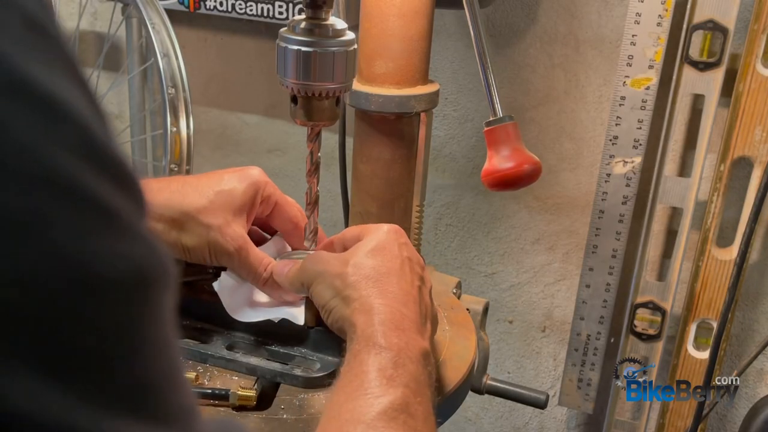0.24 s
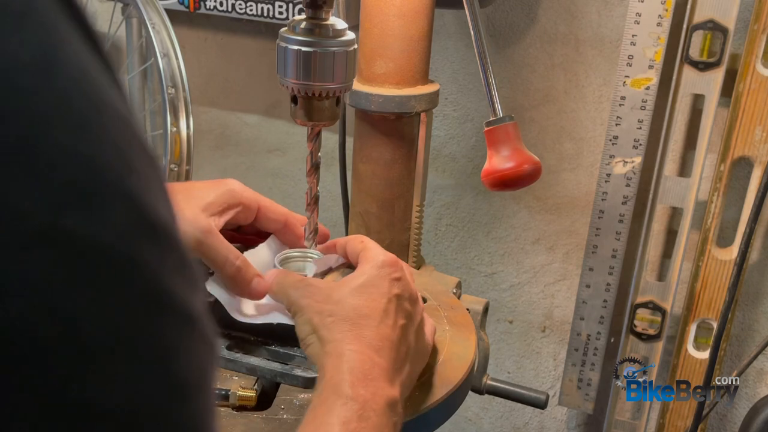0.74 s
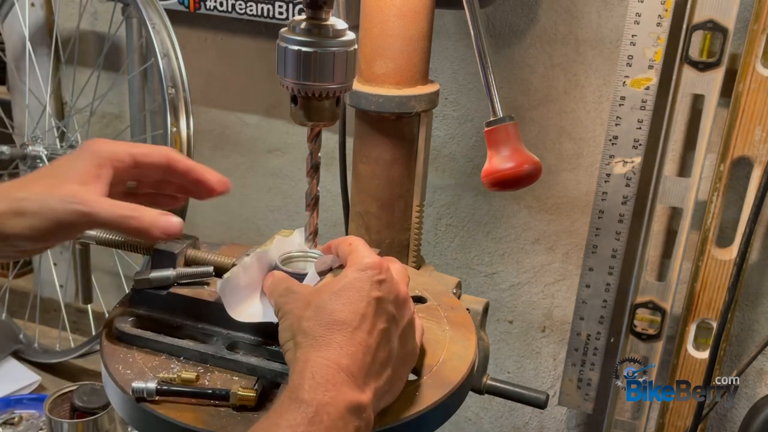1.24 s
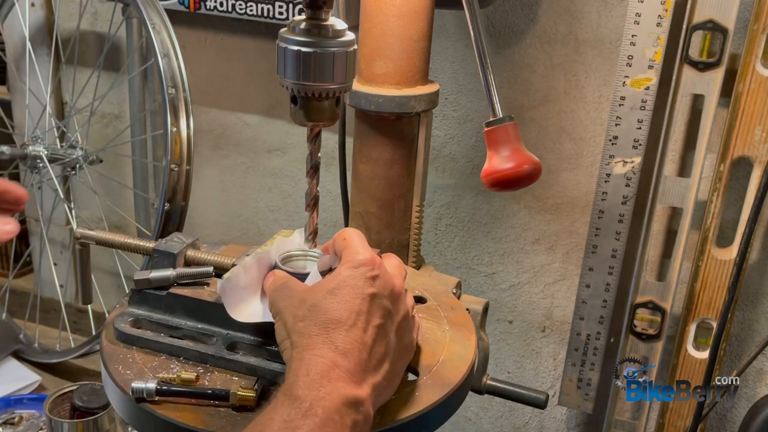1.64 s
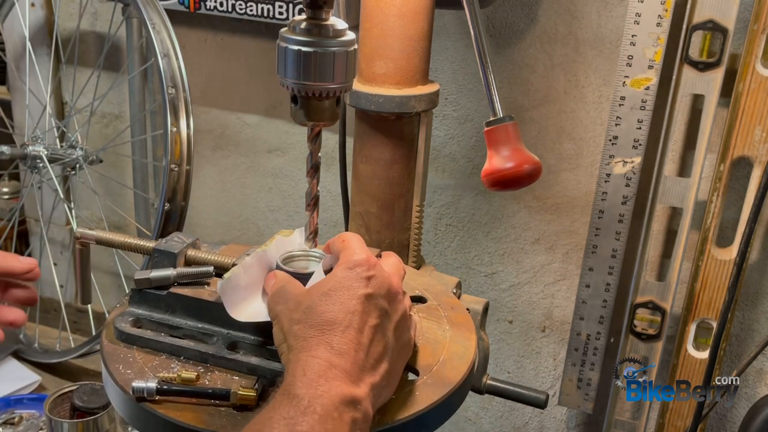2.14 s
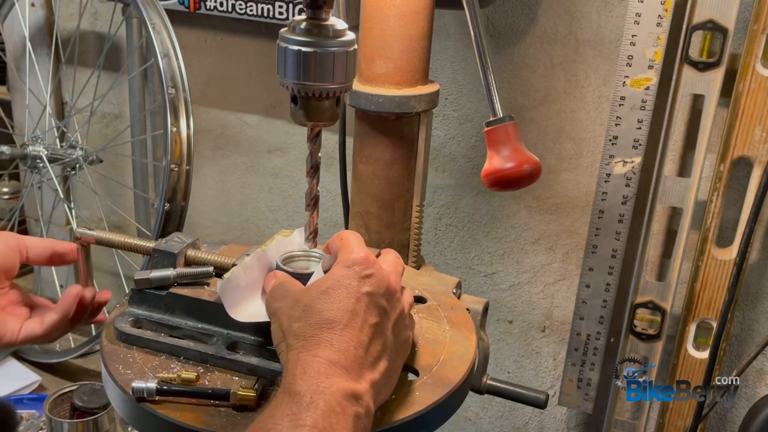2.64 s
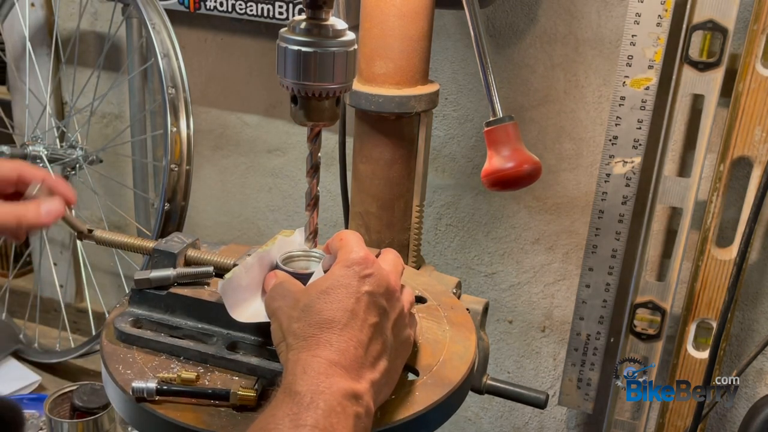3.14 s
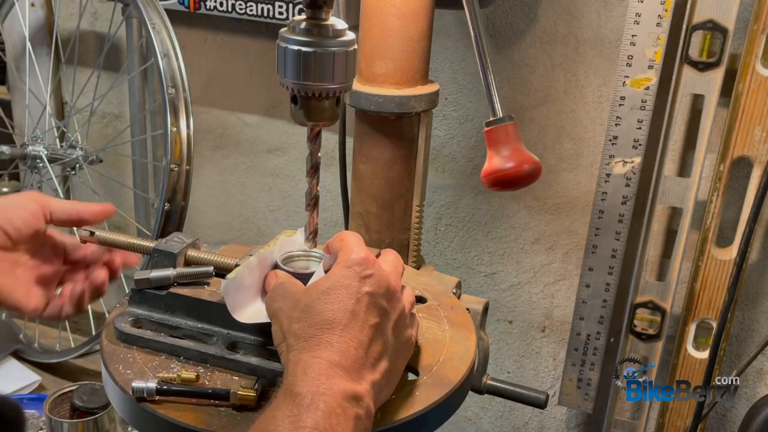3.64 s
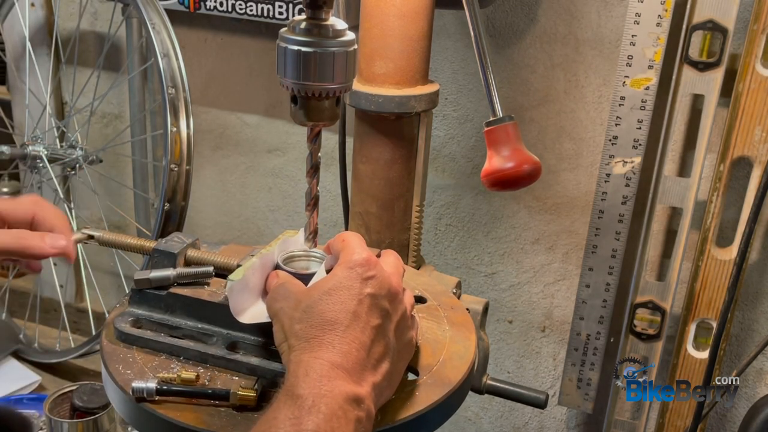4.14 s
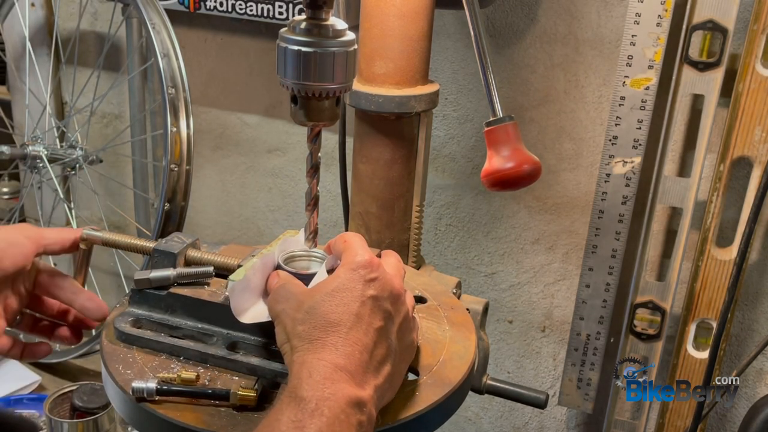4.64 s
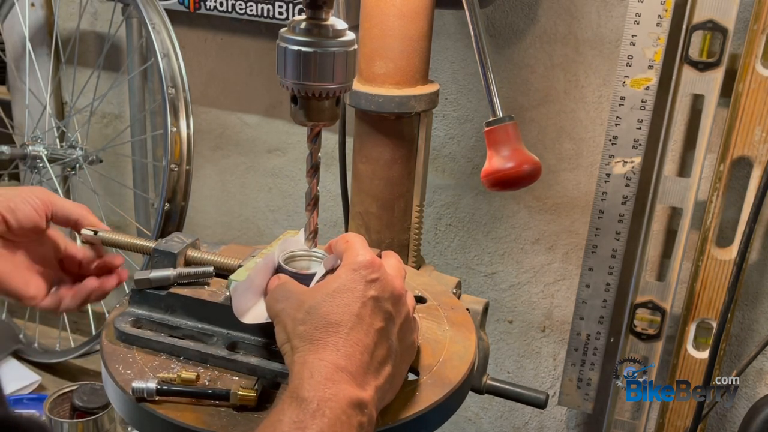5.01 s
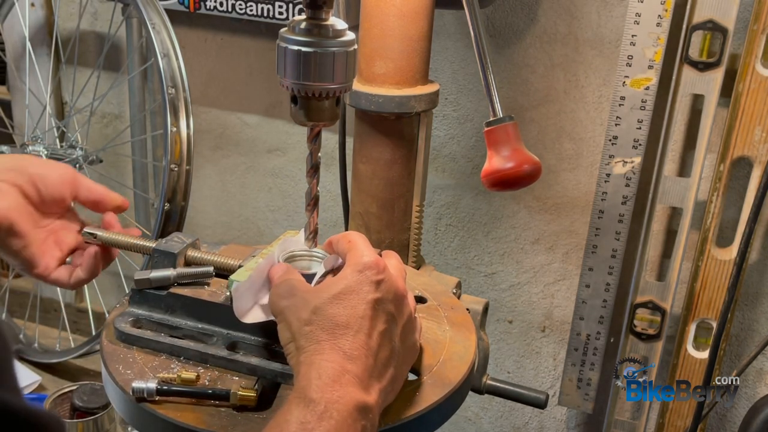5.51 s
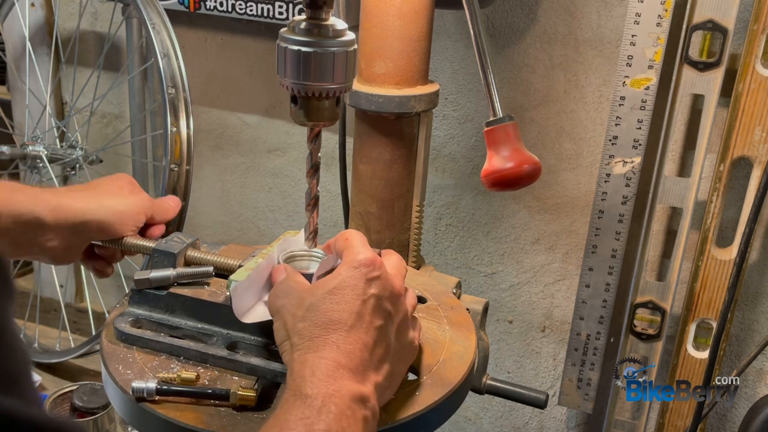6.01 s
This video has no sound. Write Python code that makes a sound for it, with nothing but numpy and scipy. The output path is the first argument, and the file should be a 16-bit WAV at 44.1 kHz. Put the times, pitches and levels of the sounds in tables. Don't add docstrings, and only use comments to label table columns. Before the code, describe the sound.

Crinkling paper and finger rubs come first, close and dry, then two sharp cracks of buckling thin metal and a few scuffs. Near silence leaves faint insect chirps, airy hiss and a low distant traffic wash. Then a vise screw binds with short gritty metallic squeaks, isolated handle ticks, and a final ringing steel clunk. A small hard-walled workshop, captured near the bench in stereo.

```python
import sys
import numpy as np
from scipy import signal
from scipy.fft import rfft, irfft, next_fast_len
from scipy.io import wavfile
from scipy.ndimage import uniform_filter1d, map_coordinates

SR = 44100
rng = np.random.default_rng(int(sys.argv[2]) if len(sys.argv) > 2 else 0)


def unload_audio(sound):
    columns = np.transpose(np.atleast_2d(sound))
    steps = np.round(np.clip(columns, -1, 1) * 32767)
    wavfile.write(sys.argv[1], SR, steps.astype(np.int16))


def rack_gain(trim_db):
    fader = np.asarray(trim_db, float)
    return 10 ** (fader / 20)


N = 276507


def unit(x):
    return x / np.sqrt(np.mean(x ** 2) + 1e-20)


def along(points, hz):
    f, v = np.transpose(points)
    return np.interp(np.log(hz + 1), np.log(f + 1), v)


def wobble(rate_hz):
    knots = rng.standard_normal(int(N * rate_hz / SR) + 4)
    return map_coordinates(knots, [np.arange(N) * rate_hz / SR])


def filtered(x, response):
    m = next_fast_len(x.shape[-1] + 8192)
    spectrum = rfft(x, m) * response(np.fft.rfftfreq(m, 1 / SR))
    return irfft(spectrum, m)[..., :x.shape[-1]]


def body(peaks):
    def peak(f, centre, width, db):
        return rack_gain(db) * 1j * f * width / (centre * centre - f * f + 1j * f * width)
    return lambda f: sum((-1) ** k * peak(f, *p) for k, p in enumerate(peaks))


def grit(spiky_db):
    size_db = spiky_db * uniform_filter1d(rng.exponential(size=N), size=3)
    return rng.standard_normal(N) * rack_gain(size_db)


def colour(x, spectrum):
    return unit(filtered(x, lambda hz: rack_gain(along(spectrum, hz))))


def place(track, s, sound):
    k = round(s * SR)
    return track + np.pad(sound, (k, N))[:N]


def strokes(rows, rise_s, fall_s):
    t, rows = np.arange(0, N / SR, .001), np.asarray(rows)
    since_s = t - rows[:, :1]
    slope = np.maximum(-since_s / rise_s, (since_s - abs(rows[:, 1:2])) / fall_s)
    shape_db = -20 * np.maximum(slope, 0)
    gains = np.sqrt(rack_gain(2 * rows[:, 2:].T) @ rack_gain(2 * shape_db))
    return [np.interp(np.arange(N) / SR, t, g) for g in gains]


def wide(spectrum, patchy_db):
    # f/Hz, correlation
    alike = [(60, 0.96), (250, 0.84), (500, 0.79), (1100, 0.077), (2400, 0.86), (4500, 0.91), (6000, 0.9),
             (15000, 0.06)]
    z = signal.stft(rng.standard_normal((2, N + 512)), nperseg=512)[2]
    field = uniform_filter1d(rng.standard_normal(z.shape[1:]), size=5, axis=0)
    field = uniform_filter1d(field, size=10, axis=1)
    pair = signal.istft(z * rack_gain(patchy_db * unit(field)), nperseg=512)[1][:, :N]

    def mid_side(hz):
        angle = np.arccos(np.clip(along(alike, hz), -1, 1)) / 2
        return rack_gain(along(spectrum, hz)) * [np.cos(angle), np.sin(angle)]
    mid, side = filtered(pair, mid_side)
    return unit(np.array([mid + side, mid - side]))


def traffic():
    # nearest t/s, distance over speed/s, engine level/dB, tyre level/dB
    passes = [(0.372, 0.076, -78, -68), (0.881, 0.17, -75.5, -68), (1.4, .15, -81, -75),
              (1.947, 0.15, -80, -78), (2.85, 0.02, -82, -69.5), (3.249, 0.16, -80.5, -65.5),
              (3.75, 0.27, -72, -67), (4.3, 0.75, -77, -72), (5.149, 0.1, -73, -70.5),
              (5.621, 0.25, -71.5, -64), (6.05, 0.18, -74, -73.5)]
    # f/Hz, density/dB per Hz
    rumble = [(15, -39), (30, -15.5), (55, -2), (90, -5.5), (140, -4.5), (250, -24), (500, -100)]
    # f/Hz, density/dB per Hz
    road = [(60, -49.5), (130, -11), (220, 0.5), (490, -0.5), (950, -4), (1400, -10), (2200, -11.5),
            (4000, -15.5), (8000, -100)]
    city_db = np.array([[-85], [-97]])
    fade_db = 15.5
    s, span, *levels_db = np.transpose(passes)
    t = np.arange(0, N / SR, .01)
    distance_sq = 1 + ((t - s[:, None]) / span[:, None]) ** 2
    near = distance_sq ** (-fade_db / 10)
    power = rack_gain(2 * np.array(levels_db)) @ near + rack_gain(2 * city_db)
    engines, tyres = (np.interp(np.arange(N) / SR, t, np.sqrt(p)) for p in power)
    tyres = tyres * rack_gain(0.534 * wobble(5.5))
    return engines * wide(rumble, patchy_db=1.5) + tyres * wide(road, patchy_db=1.7)


def night_air():
    # f/Hz, density/dB per Hz
    night = [(400, -43.5), (800, -20), (2500, -21), (4300, -19.5), (4900, -11), (5650, -5), (6300, -11.5),
             (7000, -9), (7450, -8), (8000, -19), (9000, -11.5), (11000, -17), (12500, -23), (16000, -50)]
    return rack_gain(-71 + .6 * wobble(4)) * wide(night, patchy_db=.8)


def crickets():
    chirp_db = [-71, -69.5, -70.5, -69, -72.5, -70, -70]
    first_s, every_s = 1.83, .587
    trill_start_db, sag_db_per_s, trill_end_s = -75, 1, 3.43
    t = np.arange(N) / SR

    def beats(rate_hz):
        return (.5 + .5 * np.cos(2 * np.pi * rate_hz * t + 0.37 * wobble(8))) ** 0.25
    swell = np.zeros(N)
    for s, db in zip(first_s + every_s * np.arange(len(chirp_db)), chirp_db):
        swell += rack_gain(db) * np.sin(np.pi * np.clip((t - s + 0.011) / 0.19, 0, 1)) ** 0.73
    wing = body([(4850, 350, -5), (5200, 220, 0)])
    chirp = filtered(beats(51) * rng.standard_normal(N), lambda f: wing(f) ** 2)
    tone = np.sin(2 * np.pi * 6960 * t + 1.32 * wobble(70))
    trill = beats(35) * tone * rack_gain(2.8 * wobble(23))
    trill_db = trill_start_db - sag_db_per_s * t - 300 * np.maximum(t - trill_end_s, 0)
    return swell * unit(chirp) * rack_gain([[2.5], [-2.5]]) + rack_gain(trill_db) * unit(trill)


def ticks(table, rise_s, lift_db):
    out, t = np.zeros(N), np.arange(3000) / SR
    mid_peak = body([(4000, 2500, 0)])
    sharp_peaks = body([(7200, 2500, 0), (9000, 2500, 0), (11500, 2000, -4)])

    def soft(f):
        return (1j * f / 700 / (1 + 1j * f / 700)) ** 2 / (1 + 1j * f / 2600) ** 2

    def sharp(f):
        return sharp_peaks(f) * 1j * f / (4000 + 1j * f)
    for s, db, low_db, high_db, t60 in table:
        decay = rack_gain(-60 * t / np.clip(t60, .002, .07))
        blow = rng.standard_normal(len(t)) * decay * (1 - np.exp(-t / rise_s))
        click = filtered(blow, lambda f: rack_gain(low_db + 9.0) * soft(f) + rack_gain(-5.5) * mid_peak(f) ** 2
                         - rack_gain(high_db + 11.0) * sharp(f))
        out = place(out, s, rack_gain(db + lift_db) * click / abs(click).max())
    return out


def paper():
    # t/s, hold/s, rustle level/dB, sheet/dB re rustle, thump/dB re rustle
    rubs = [(0.015, 0.844, -58.5, -11.5, -32), (0.074, 0.0097, -57, -38, -40), (0.181, 0.039, -62, -9, -38),
            (0.256, 0.034, -51, -15, -24), (0.31, 0.056, -52, -13.5, -38), (0.526, 0.032, -57, -13, -27),
            (0.74, 0.094, -56, -14, -23), (0.877, 0.11, -52, -12.5, -33.5), (0.876, 0.02, -51.5, -18, -3.5),
            (0.893, 0.013, -47, -15, -1), (1.666, 0.005, -64.5, -8, -25), (1.059, 0.081, -71, 1, -24),
            (1.339, 0.0034, -46, -9, -45.5), (1.372, 0.041, -52.5, -2, -16.5),
            (1.512, 0.089, -59.5, -8, -16), (1.577, 0.02, -56.5, -6, -33), (1.656, 0.073, -80, 2, -22),
            (1.792, 0.012, -70, -7.5, -5), (1.937, 0.002, -52, -3, -11)]
    # f/Hz, density/dB per Hz
    rustle_spectrum = [(1600, -35.5), (2800, -26.5), (3700, -6), (4800, -2), (6500, -4.5), (8800, 2.5),
                       (11000, 8), (13000, -21.5), (15000, -7), (16500, -23)]
    # f/Hz, density/dB per Hz
    sheet_spectrum = [(260, -40.5), (450, -11), (513, -9.5), (585, -15.5), (1030, -8.5), (1610, -10),
                      (2300, -3.5), (3200, -0.5), (4160, -22.5), (7040, -120)]
    # f/Hz, density/dB per Hz
    thump_spectrum = [(80, -44.5), (130, -9), (200, -4), (330, -3.5), (500, -18.5)]
    rows = [(s, hold, db, db + sheet_db, db + thump_db) for s, hold, db, sheet_db, thump_db in rubs]
    rustle, sheet, thump = strokes(rows, rise_s=0.013, fall_s=0.054)
    slips = grit(spiky_db=2.6) * rack_gain(1.3 * wobble(90))
    rubbing = rustle * colour(slips, rustle_spectrum) + sheet * colour(slips, sheet_spectrum)
    return rubbing + thump * colour(rng.standard_normal(N), thump_spectrum)


def hollows():
    # centre t/s, length/s, f/Hz, width/Hz, level/dB
    slides = [(0.152, 0.024, 2630, 700, -62), (0.141, 0.022, 1070, 200, -69),
              (0.262, 0.049, 1120, 400, -61.5), (0.283, 0.086, 4800, 900, -60),
              (0.312, 0.013, 2620, 600, -52), (0.315, 0.046, 1370, 400, -59),
              (0.342, 0.051, 5200, 1200, -50.5), (0.364, 0.04, 1090, 200, -57),
              (0.383, 0.011, 2450, 500, -53.5), (0.399, 0.039, 1360, 300, -66),
              (0.465, 0.03, 1090, 300, -66.5), (0.498, 0.046, 790, 510, -64.5),
              (0.742, 0.013, 2760, 600, -56), (0.757, 0.024, 1140, 300, -64),
              (0.8, 0.053, 1320, 400, -62.5), (0.882, 0.02, 860, 300, -57), (0.899, 0.022, 8940, 1500, -43),
              (1.003, 0.011, 2930, 1500, -55.5), (1.064, 0.007, 980, 400, -65.5),
              (2.816, 0.023, 1300, 900, -72), (2.94, 0.056, 868, 60, -65), (3.091, 0.021, 930, 80, -61),
              (3.16, 0.01, 1940, 200, -56), (3.168, 0.036, 3180, 252, -78), (3.177, 0.016, 960, 80.5, -48),
              (3.55, 0.066, 2187, 91, -62), (1.342, 0.0079, 2230, 600, -47), (5.296, 0.081, 1470, 700, -63),
              (5.408, 0.028, 700, 500, -58), (5.48, 0.054, 786, 497, -53.5), (4.053, 0.014, 2270, 200, -63),
              (4.06, 0.012, 8900, 1500, -54), (4.429, 0.019, 3780, 900, -60), (4.51, 0.023, 2380, 251, -69),
              (4.512, 0.023, 9940, 1190, -49.5), (4.592, 0.017, 3200, 500, -65),
              (4.631, 0.064, 2980, 1200, -68), (4.686, 0.011, 3650, 1210, -61.5),
              (5.571, 0.0093, 2880, 1182, -56.5),
              (1.72, 0.052, 3100, 900, -68), (3.204, 0.11, 9200, 400, -76), (3.597, 0.14, 7700, 500, -74),
             (3.715, 0.1, 7650, 500, -75), (5.285, 0.06, 2490, 500, -58), (5.372, 0.035, 2650, 600, -60),
             (2.451, 0.18, 1500, 1830, -75.5), (2.564, 0.1, 2600, 1482, -81),
             (3.001, 0.13, 2600, 1410, -74), (3.296, 0.065, 3000, 2000, -87),
             (5.511, 0.042, 262, 60, -51.5)]
    half_s = 5000 / SR
    out, u = np.zeros(N), np.linspace(-1, 1, 10001)
    for s, length, hz, width, db in slides:
        slips = rng.standard_normal(len(u)) * rack_gain(3.8 * rng.exponential(size=len(u)))
        ring = unit(filtered(slips, lambda f: body([(hz, width, 0)])(f) ** 2))
        swell = np.exp(-(u * half_s / (length / 2)) ** 2)
        out = place(out, s - half_s, rack_gain(db - 2.5) * ring * swell)
    return out


def tin(blow, low_hz, low_db, middle_db, high_db):
    # f/Hz, width/Hz, level/dB
    tin_mid = [(3100, 1200, -0.5), (4670, 2240, -5)]
    # f/Hz, width/Hz, level/dB
    tin_high = [(6410, 390, -1), (7970, 1100, 3), (10400, 1300, 6)]
    edge_hz, edge_width = 1800, .72

    def response(f):
        groups = body([(low_hz, 900, low_db)])(f)
        groups = groups - rack_gain(middle_db) * body(tin_mid)(f) + rack_gain(high_db) * body(tin_high)(f)
        edge = -f * f / (edge_hz ** 2 - f * f + 1j * f * edge_hz * edge_width)
        bass = rack_gain(-22.5) * body([(1000, 1000, 0)])(f) * 1j * f / (250 + 1j * f)
        return groups * edge ** 3 + bass
    return filtered(blow, response)


def snaps():
    # t/s, peak level/dB, lowest ring f/Hz, low level/dB, middle level/dB, high level/dB
    buckles = [
        (1.1129, -8, 2503, -4, -2, -7.5),
        (1.392, -10, 2060, -9, -6, -7.5),
    ]
    spread = .25
    out, t = np.zeros((2, N)), np.arange(2000) / SR - .002
    gather = rack_gain(-0.5 + 60 * t / 0.0038)
    rattle = rack_gain(-60 * t / 0.032) * 0.92 + rack_gain(-60 * t / 0.054) * .06
    for s, db, *rings in buckles:
        common, apart = rng.standard_normal((2, len(t)))
        noise = common + spread * apart * [[1], [-1]]
        blow = noise * np.where(t < 0, gather, rattle)
        blow[:, np.argmin(abs(t))] = 13
        crack = tin(blow, *rings)
        out += [place(np.zeros(N), s - .0003, rack_gain(db) * c / abs(c_max)) for c, c_max in
                zip(crack, [abs(crack).max()] * 2)]
    return filtered(out, lambda f: rack_gain([[1.8], [-1.8]] / (1 + (f / 7000) ** 2)))


def screw():
    # t/s, hold/s, nut level/dB, handle level/dB, scrape level/dB
    binds = [(2.9, 3.2, -100, -78.5, -99), (2.82, 0.065, -63.5, -85, -91), (2.925, 0.034, -56.5, -72, -100),
             (3.08, 0.05, -58, -66.5, -87.5), (3.145, 0.063, -48, -62.5, -83),
             (3.21, 0.056, -58, -71, -82.5), (3.545, 0.031, -75, -60, -81), (3.63, 0.39, -67.5, -74.5, -81),
             (3.85, 0.3, -114, -90, -82), (4.045, 0.024, -71, -63, -69), (4.185, 0.031, -88, -73, -87),
             (4.43, 0.0067, -83, -65, -70.5), (4.51, 0.025, -81, -70, -80), (4.95, 0.39, -79, -90, -80),
             (5.272, 0.03, -69.5, -50.5, -61), (5.365, 0.015, -82, -53, -70), (5.415, 0.013, -74, -63, -72),
             (5.465, 0.0093, -49.5, -53, -63.5), (5.51, 0.06, -88, -86, -76)]
    # f/Hz, width/Hz, level/dB
    slack_nut = [(736, 29, 2), (880, 180, 2)]
    # f/Hz, width/Hz, level/dB
    loaded_nut = [(937, 300, -4), (960, 77, 5), (1196, 520, -13)]
    # f/Hz, width/Hz, level/dB
    free_handle = [(1862, 45, -3.5), (2230, 99, -1.5), (2307, 55, 3), (2670, 580, -6)]
    # f/Hz, width/Hz, level/dB
    tight_handle = [(2278, 390, 1.5), (2358, 340, 2.5), (2730, 370, -9.5)]
    # f/Hz, density/dB per Hz
    scrape_spectrum = [(700, -38), (1300, -19), (2500, 0), (4500, 1.5), (6500, -5), (8800, 4.5), (11000, 8),
                       (13000, -34), (16000, -25)]
    take_up_s, clamp_s, release_s = 3.03, 4.6, 5.4
    nut_gain, handle_gain, scrape_gain = strokes(binds, rise_s=0.04, fall_s=0.045)
    t = np.arange(N) / SR

    def ring(peaks, steep):
        return unit(filtered(grit(spiky_db=4.5), lambda f: body(peaks)(f) ** steep))
    nut = np.where(t < take_up_s, ring(slack_nut, 1.04), ring(loaded_nut, 1.64))
    nut = nut * rack_gain(0.21 * wobble(60))
    pressed = (t > clamp_s) & (t < release_s)
    handle = np.where(pressed, ring(tight_handle, 1.64), ring(free_handle, 1.26))
    handle = handle * rack_gain(0.7 * wobble(30))
    scrape = colour(grit(spiky_db=1.5), scrape_spectrum) * rack_gain(1.5 * wobble(80))
    return rack_gain(-12.0) * nut_gain * nut + rack_gain(-7.0) * handle_gain * handle + rack_gain(10.0) * scrape_gain * scrape


def jaws():
    # t/s, steel level/dB, table knock level/dB
    bites = [
        (5.392, -57, -65),
        (5.408, -41.5, -54.5),
        (5.4541, -50, -60),
        (5.461, -38.5, -40),
        (5.488, -57, -45),
        (5.5, -64, -48),
    ]
    # f/Hz, level/dB, t60/s
    jaw_modes = [(1520, -66, 0.027), (2097, 4, 0.036), (2270, 2.5, 0.1), (2550, -6, 0.12),
                 (3604, 4.5, 0.04), (4000, 0, 0.055), (4800, -2, 0.044), (6060, 15.5, 0.005)]
    # f/Hz, level/dB, t60/s
    table_modes = [(222.7, -0.5, 0.25), (262, -2, 0.12), (331, 5, 0.11), (480, -5, 0.07), (604, -5, 0.06),
                   (839, 7, 0.056), (1020, 3, 0.049)]
    out, t = np.zeros(N), np.arange(SR // 4) / SR

    def ring(modes):
        total = np.zeros(len(t))
        for hz, db, t60 in modes:
            level = rack_gain(db + 2 * rng.standard_normal() - 60 * t / t60)
            total += level * np.sin(2 * np.pi * (hz * t + rng.random()))
        return total
    for s, steel_db, knock_db in bites:
        grind = rack_gain(-60 * t / 0.022) * rng.standard_normal(len(t))
        chatter = 1 + 0.43 * unit(uniform_filter1d(rng.standard_normal(len(t)), size=40))
        steel = (ring(jaw_modes) * chatter + 0.33 * grind) * (1 - np.exp(-t / 0.00097))
        thud = unit(filtered(rng.standard_normal(len(t)), body([(300, 440, -1), (700, 990, -7.5)])))
        thud = thud * rack_gain(-60 * t / 0.15)
        knock = (ring(table_modes) + 1.88 * thud) * (1 - np.exp(-t / 0.021))
        out = place(out, s, rack_gain(steel_db - 9.5) * steel + rack_gain(knock_db - 8.0) * knock)
    return out


def shop(x):
    # f/Hz, t60/s
    decay = [(300, 0.12), (2500, 0.23), (8000, 0.25), (13000, 0.14)]
    out = np.zeros((2, N))
    for part in np.array_split(np.arange(N), 20):
        hz, t, z = signal.stft(rng.standard_normal((2, SR // 3)), SR, nperseg=128)
        z[1] = z[0] + np.clip(900 / (hz[:, None] + 900), .1, 1) * z[1]
        tail = signal.istft(z * rack_gain(-60 * t / along(decay, hz)[:, None]), SR, nperseg=128)[1]
        tail = tail / np.linalg.norm(tail, axis=1, keepdims=True)
        wet = signal.fftconvolve(x[part][None], tail, axes=1)[:, :N - part[0]]
        out[:, part[0]:part[0] + wet.shape[1]] += wet
    return out


def scene():
    # t/s, peak level/dB, low/dB, high/dB, t60/s
    sharp_ticks = [(0.0024, -53.5, -19, -19, 0.0031), (0.1965, -52, -20, 5, 0.004),
                   (0.2418, -48, -10, -3, 0.0056), (0.3087, -46, -15, -14, 0.0028),
                   (0.3825, -48, -3, -4, 0.005), (0.6375, -47, -1, -3, 0.0092),
                   (0.6964, -48.5, -11, -16, 0.0052), (0.7352, -50, -14, -2, 0.013),
                   (0.7712, -63, -25, 10, 0.004), (0.8026, -43.5, -4, -3, 0.0085),
                   (0.8354, -51.5, -9, -18, 0.011), (0.8984, -49, -20, 8, 0.005),
                   (0.9801, -42, -24, 12, 0.004), (1.271, -41.5, -59, -23.5, 0.0034),
                   (1.3224, -37.5, -9, -9.5, 0.0018), (1.542, -53, -25, 14, 0.006),
                   (1.5965, -54, -15, 8, 0.008), (1.681, -63.5, -7, -9, 0.0043),
                   (1.9305, -47.5, -16, 3.5, 0.01), (2.4821, -50.5, -17, -2, 0.008),
                   (2.851, -65, -23, 14, 0.0065), (3.832, -60, -20, 12, 0.01),
                   (3.9455, -47.5, -51, -21.5, 0.0026), (3.982, -59, -30, -10, 0.003),
                   (4.011, -62, -30, -8, 0.003), (4.0315, -50, -33, -3, 0.0027),
                   (4.0357, -49, -18, 9, 0.0028), (4.0806, -56, -15, 8, 0.005),
                   (4.109, -30.5, -44, -5.5, 0.0017), (4.1244, -64, -25, -4, 0.004),
                   (4.185, -39.5, -46, -15, 0.0078), (4.2004, -56, -14, -21, 0.004),
                   (4.2536, -57.5, -18, -7, 0.0045), (4.3445, -63.5, -20, -6, 0.0047),
                   (4.3799, -59, -19, 7, 0.0066), (4.5021, -58, -7, 12, 0.0072),
                   (4.5815, -59, -7, -6, 0.0034), (4.683, -61, -17, -2, 0.019),
                   (4.691, -58.5, -9, -6, 0.011), (4.984, -54, -23.5, 6, 0.0033),
                   (5.007, -49, -25, 11, 0.007)]
    # t/s, peak level/dB, low/dB, high/dB, t60/s
    scuffs = [(0.7352, -46, 2, -6, 0.067), (0.8669, -40, 6, 7, 0.068), (0.9974, -44, -46, -30, 0.014),
              (1.3384, -53, -3, 6, 0.031), (1.513, -36.5, 12.5, 12, 0.045), (1.5738, -48.5, 11, -10, 0.083),
              (1.6222, -50, -22, -44, 0.029), (1.7878, -39, 17, 7.5, 0.03), (1.9305, -38, 3.5, -2.5, 0.019),
              (1.9545, -51, -25.5, -31.5, 0.026), (2.8094, -55.5, 10, -20, 0.013),
              (3.5568, -48, 12, -22, 0.016), (3.6137, -52.5, 6, -24, 0.028), (4.0532, -53, 6, -2, 0.023),
              (4.4164, -48.5, -37, 4, 0.035), (4.4258, -38, -32, 19, 0.015), (4.5022, -63, -19, 17, 0.023),
              (4.5903, -55, -17, -11, 0.064), (4.9915, -57, -20, 10, 0.02), (5.2305, -49, -6, -8, 0.025),
              (5.5653, -48, 5, -10, 0.018)]
    hands = paper() + hollows()
    hands += ticks(sharp_ticks, rise_s=0.0005, lift_db=7) + ticks(scuffs, rise_s=.001, lift_db=-1.6)
    near = snaps() + hands * rack_gain([[.3], [-.3]]) + (screw() + jaws()) * rack_gain([[1.7], [-1.7]])
    return near + rack_gain(-9.5) * shop(near.mean(axis=0)) + traffic() + night_air() + crickets()


def drop_weak_bands(x):
    # f/Hz, level/dB
    kept_mid = [(9900, -140), (10150, -101), (10500, -105), (11000, -105), (12500, -106), (13200, -102),
                (14500, -103), (16000, -103)]
    # f/Hz, level/dB
    kept_side = [(1800, -140), (2100, -115), (5000, -111), (6000, -100), (8800, -100), (8900, -112),
                 (11500, -107), (13000, -99.5), (16000, -100)]
    # f/Hz, level/dB re frame mean
    mask_limit = [(9800, -70), (10250, -13), (10600, -30), (12000, -22), (13000, -19), (16000, -22)]
    t, z = signal.stft([x[0] + x[1], x[0] - x[1]], SR, nperseg=2048)[1:]
    hz = np.arange(1024) * SR / 2048
    bands = (np.abs(z[:, :1024].reshape(2, 64, 16, -1)) ** 2).mean(axis=2)
    level = np.repeat(bands, 16, axis=1)
    limit = rack_gain(np.array([along(kept_mid, hz), along(kept_side, hz)]) + 6)[:, :, None]
    swing_db = 3.0 * wobble(35)[np.minimum(t * SR, N - 1).astype(int)]
    mean = level[0].mean(axis=0)
    masked = rack_gain(2 * along(mask_limit, hz[:, None])) * mean
    masked = masked * (mean < 6 * np.roll(mean, 1))
    kept = level > (limit * rack_gain(swing_db)) ** 2 + masked
    kept[1] &= (level[1] > rack_gain(-22) * level[0]) | (level[1] > rack_gain(-150)) | (hz[:, None] < 2000)
    z[:, :1024] *= kept
    mid, side = signal.istft(z, SR, nperseg=2048)[1][:, :N] / 2
    return np.array([mid + side, mid - side])


def band_limit(x):
    return signal.sosfilt(signal.butter(12, 16790, fs=SR, output="sos"), x)


def record(dry):
    # f/Hz, level/dB
    mic = [(20, 2.5), (11000, 2.5), (12500, -1), (13400, -25), (15000, -5.5), (16000, -16.5), (16800, -21),
           (16900, -84.5)]
    # f/Hz, phase/rad
    port_lead = [(20, 0), (1700, -.1), (3500, -.7), (5000, -.3), (6000, 0), (8650, 0), (9500, 2.05),
                 (10250, 3.14), (10850, 4.1), (12000, 6.28), (12800, 7), (13750, 9.42), (15500, 12.57)]

    def ports(hz):
        return rack_gain(along(mic, hz)) * np.exp(.5j * along(port_lead, hz) * [[-1], [1]])
    mix = drop_weak_bands(filtered(dry, ports))
    return band_limit(mix)


dry = scene()
out = record(dry)
unload_audio(out)
```